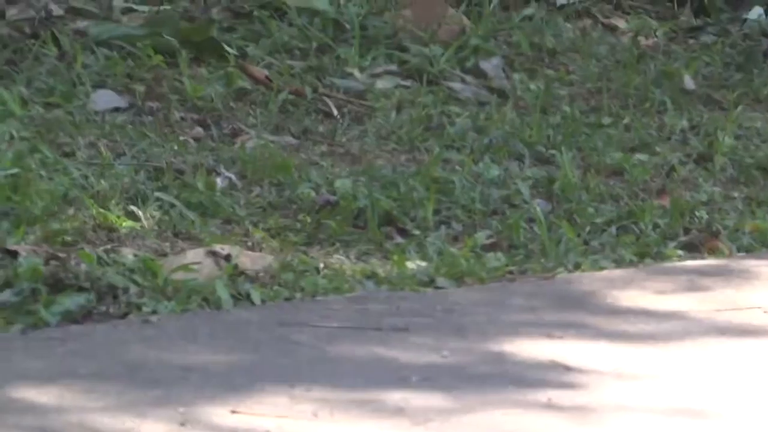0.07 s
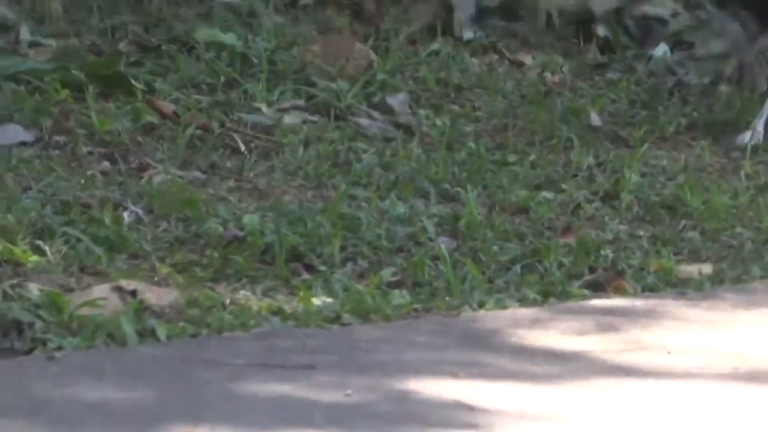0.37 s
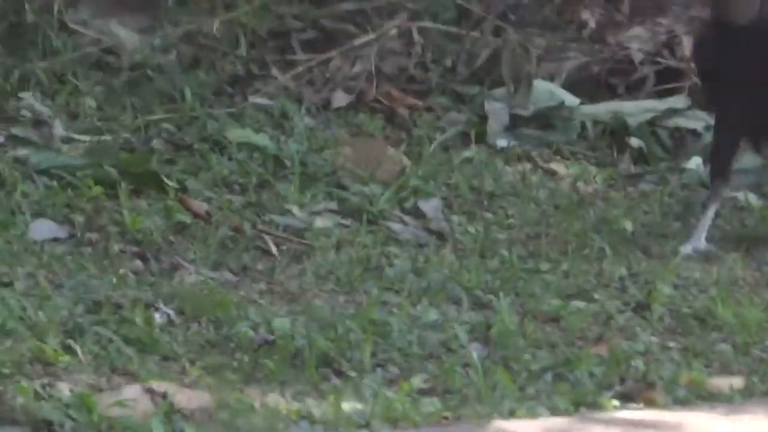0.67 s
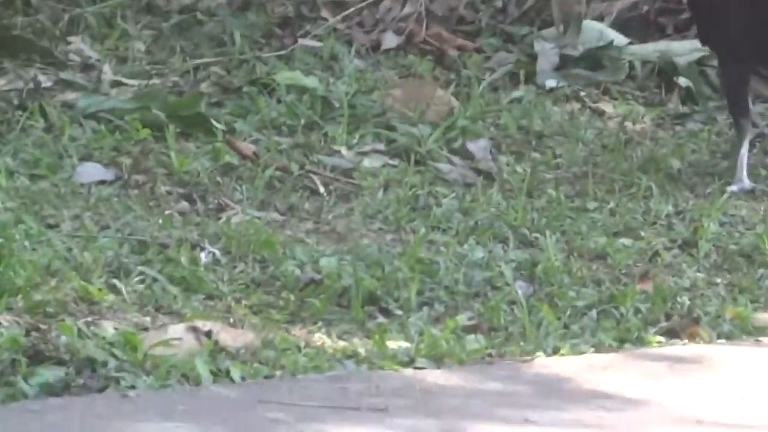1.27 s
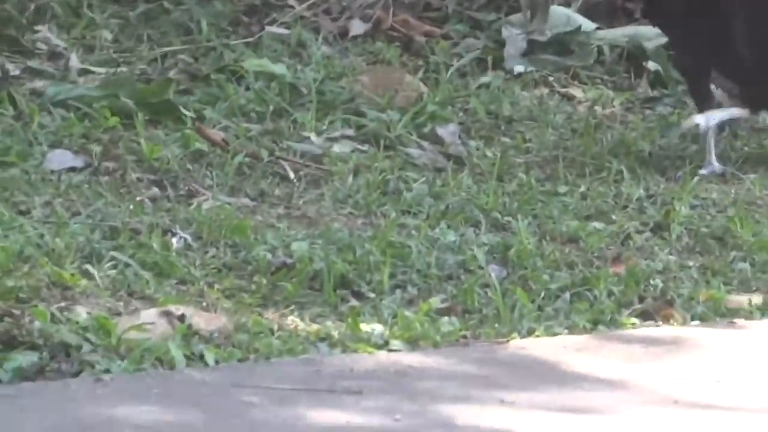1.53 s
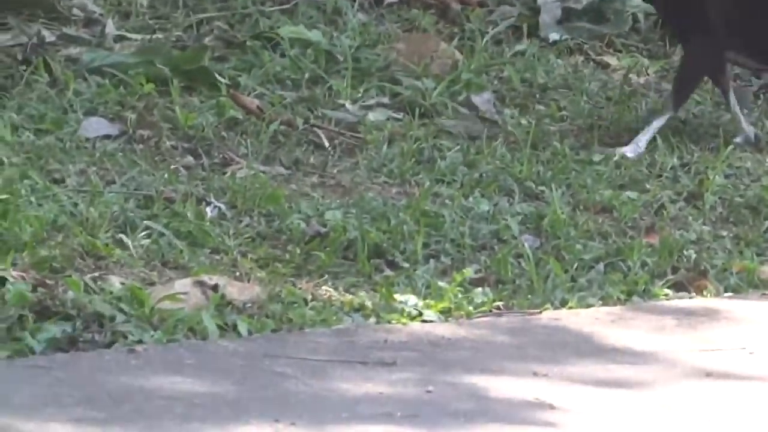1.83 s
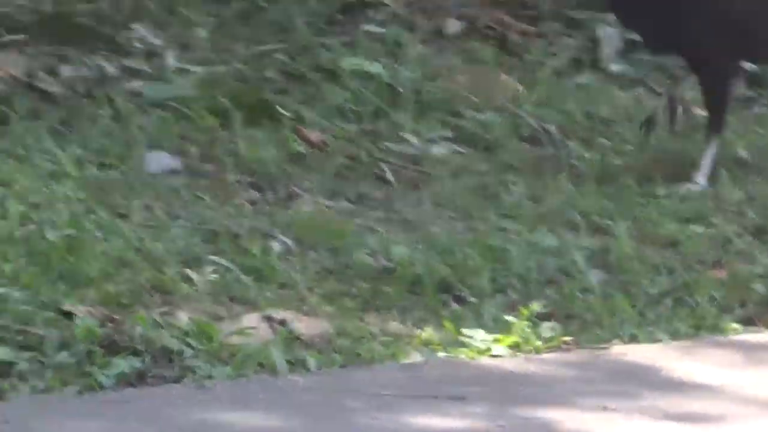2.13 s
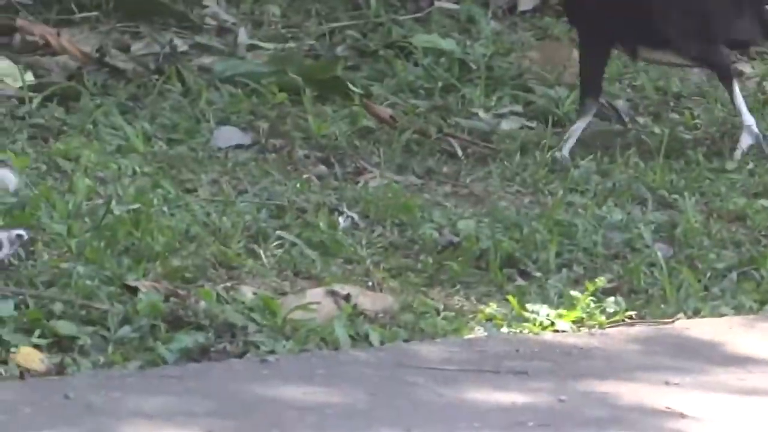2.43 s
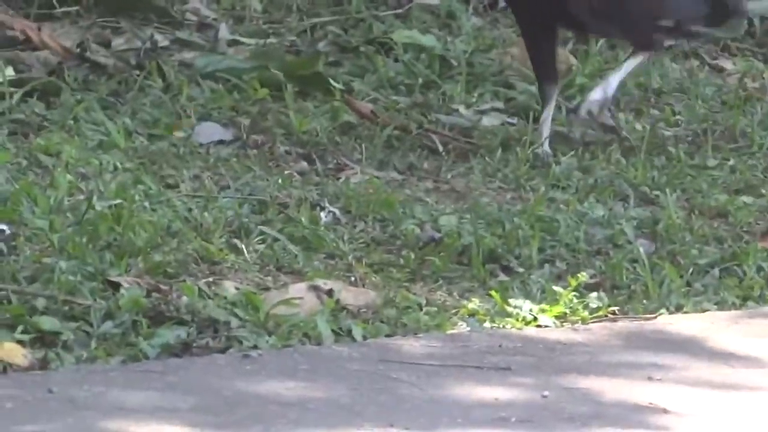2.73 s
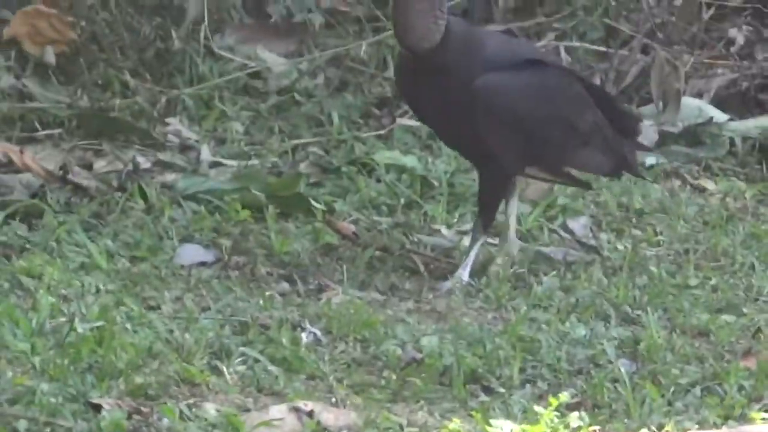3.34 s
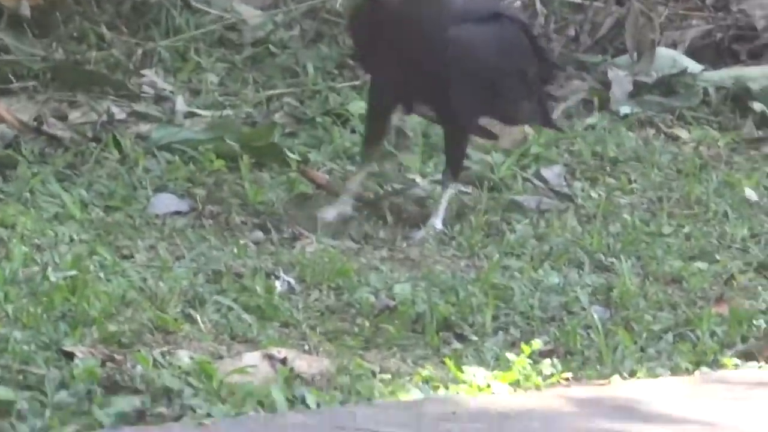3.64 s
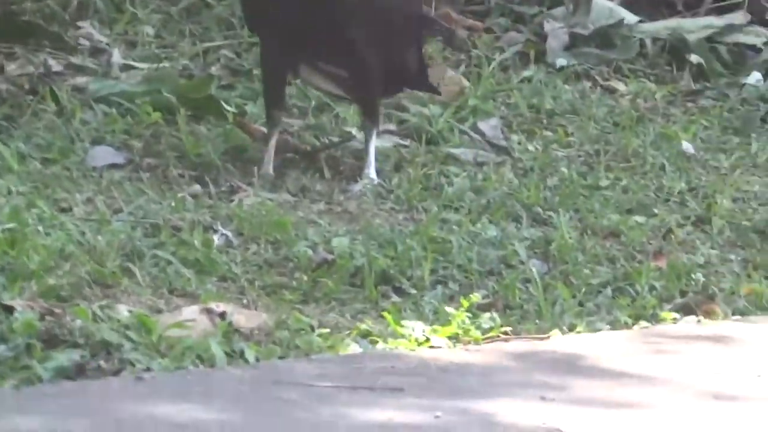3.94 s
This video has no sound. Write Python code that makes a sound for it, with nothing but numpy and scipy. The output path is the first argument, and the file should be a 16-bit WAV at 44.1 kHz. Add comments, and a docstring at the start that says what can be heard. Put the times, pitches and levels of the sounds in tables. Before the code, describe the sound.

Distant traffic rumbles steadily outdoors under hiss, while a walking bird faintly ticks through grass.

```python
"""Beside a grassy path

A low rumble and a dull roar, as of distant traffic, run on with a faint hum and a camera's own hiss.
Rumble, roar and hiss are shaped noise; the hum is a few soft tones. While a bird walks by, dry grass
ticks, a leaf cracks and faint blips sound. Two close microphones hear the bass alike; the roar leans right."""
import sys
import numpy as np
from scipy import signal
from scipy.fft import rfft, irfft
from scipy.io import wavfile
from scipy.ndimage import uniform_filter1d

SR = 44100
rng = np.random.default_rng(int(sys.argv[2]) if len(sys.argv) > 2 else 0)


def log_audio(samples):
    """Write samples as a 16-bit WAV file to the path given in sys.argv[1]."""
    # one column per channel
    frames = np.atleast_2d(samples).T
    # limit to full scale, then quantise
    limited = np.clip(frames, -1, 1)
    pcm = np.round(limited * 32767).astype(np.int16)
    wavfile.write(sys.argv[1], SR, pcm)


N = 176400
FRAME, HOP = 4096, 1024  # noise is shaped in overlapping slices: their length and spacing in samples
HZ = np.fft.rfftfreq(FRAME, 1 / SR)
FRAME_S = np.arange(N // HOP + 5) * HOP / SR


def rumble(level_db=-44.7):
    """A low rumble, as of distant traffic; it rises and falls most near 200 Hz, where it is strongest."""
    # Each row: frequency in Hz, strength of the noise there in dB.
    spectrum = [(10, -38), (25, -28), (40, -25), (52, -14.5), (70, -12.7), (120, -8.1), (148, -9.5),
                (195, 0), (225, -.7), (288, -3.5), (340, -10.2), (400, -10.7), (470, -18), (620, -32),
                (1500, -80)]
    # Each row: time in seconds, boost or cut of the strongest part in dB.
    swell = [(0, -.6), (.12, -1.8), (.25, .3), (.45, .3), (.8, -1.8), (.92, .8), (1.22, -1), (1.31, 3.6),
             (1.45, 1.3), (1.7, -1.6), (1.9, -1), (1.97, 2.8), (2.05, -1), (2.8, .4), (3.2, .3),
             (3.6, -1.2), (3.87, 1), (4, -1)]
    swell_db = bell_curve(centre_hz=215, width_hz=85) * over_time(swell)
    return noise(level_db + at_hz(spectrum, HZ) + swell_db)


def roar(level_db=-44.8):
    """A dull roar that swells a little; a ringing in it comes and goes, and its top slowly dulls."""
    # Each row: frequency in Hz, strength of the noise there in dB.
    spectrum = [(150, -45), (490, -16.3), (610, -15.5), (725, -9.8), (820, -12.3), (900, -17), (1000, -17),
                (1110, -14.2), (1300, -18.7), (1450, -23.2), (1570, -18.6), (1800, -21.4), (2030, -19.8),
                (2350, -24.4), (2520, -22.8), (2640, -25.8), (2730, -22.8), (2830, -25.5), (2940, -22),
                (3150, -26.3), (3650, -27.4), (4200, -31.8), (4450, -39.5), (4950, -45.5), (5500, -57),
                (7000, -85)]
    # Each row of these three: time in seconds, boost or cut in dB.
    swell = [(0, -.6), (.9, -.7), (1.5, .3), (2.2, -.1), (2.75, .3), (3.3, -.3), (3.68, 1), (4, .3)]  # the whole roar
    edge_level = [(0, 1), (.3, 2.2), (1.1, 1.3), (1.8, .5), (2.5, -1), (3, -3.5), (3.4, -1.2), (4, -1.2)]  # its highest part
    ring_level = [(0, -1.2), (1, -.5), (1.6, 1.5), (2.5, 1), (3.3, -.1), (4, 0)]  # one narrow, ringing band
    edge_db = bell_curve(centre_hz=4600, width_hz=950) * over_time(edge_level)
    ring_db = bell_curve(centre_hz=1110, width_hz=120) * over_time(ring_level)
    return noise(level_db + at_hz(spectrum, HZ) + over_time(swell) + edge_db + ring_db)


def grass_tick(db, rise_s=.00025, tail_db=-21, tail_s=.018):
    """A soft, bright snap of dry grass with a faint fizzing tail."""
    # The tones the snap rings with. Each row: pitch in Hz, level in dB against the strongest.
    tones = [(8400, 0), (9900, -4), (14000, -13)]
    t = np.arange(0, .06, 1 / SR)
    treble = signal.butter(2, [7000, 10500], "bandpass", fs=SR, output="sos")
    fizz = unit(signal.sosfilt(treble, rng.standard_normal(len(t))))
    tail = fizz * amp(tail_db) * np.exp(-t / tail_s)
    snap = sum(pan(hz) * amp(tone_db) * np.sin(2 * np.pi * hz * t) for hz, tone_db in tones)
    return amp(db) * (snap * rise_and_fade(t, rise_s) + tail)


def leaf_crack(db=-33, centre_hz=3900, rise_s=.0025):
    """A dry leaf cracks: a short, broad burst of noise."""
    t = np.arange(FRAME) / SR
    band = bell_curve(centre_hz, width_hz=650)
    burst = unit(irfft(rfft(rng.standard_normal(FRAME)) * band))
    return pan(centre_hz) * amp(db) * burst * rise_and_fade(t, rise_s)


def blip(db, hz, length_s):
    """A brief tone that swells and fades, its pitch wavering by just under one percent."""
    t = np.arange(0, length_s, 1 / SR)
    pitch_hz = hz * (1 + .008 * drift(N, size=200)[:len(t)])
    cycles = np.cumsum(pitch_hz) / SR
    swell = np.sin(np.pi * t / length_s) ** 2
    return pan(hz) * amp(db) * swell * np.sin(2 * np.pi * cycles)


def hum(wander_hz=.6):
    """Faint, steady tones that waver slightly in pitch."""
    # Each row: pitch in Hz, level in dB.
    tones = [(17.5, -58), (50, -46.5), (204.5, -44), (400, -54), (497, -52), (812, -53)]
    out = np.zeros((2, N))
    for hz, db in tones:
        pitch_hz = hz + wander_hz * drift(N, size=12000)
        cycles = rng.random() + np.cumsum(pitch_hz) / SR
        out += pan(hz) * amp(db) * np.sqrt(2) * np.sin(2 * np.pi * cycles)
    return out


def hiss(level_db=-44.6):
    """The camera's own high, nearly even hiss."""
    # Each row: frequency in Hz, strength of the noise there in dB.
    spectrum = [(3500, -75), (5600, -55), (6500, -49.8), (7300, -43), (9100, -41.5), (10300, -48.2),
                (11500, -53.5), (13200, -61.3), (15000, -56), (15700, -58)]
    # Each row: time in seconds, boost or cut in dB.
    swell = [(0, -.2), (1.1, -.2), (1.6, .2), (1.72, 1.3), (1.95, .2), (4, .1)]
    return noise(level_db + at_hz(spectrum, HZ) + over_time(swell))


def noise(shape_db):
    """Noise shaped over time and frequency, as two close microphones hear it."""
    # Each row: frequency in Hz, how alike the two sides are from 0 to 1.
    likeness = [(200, .999), (400, .982), (500, .925), (750, .983), (1400, .95), (2200, .967), (3800, .91),
                (5100, .4), (6000, .43), (7300, .88), (9800, .92), (10600, .998)]
    # Each row: frequency in Hz, how far the left wave runs ahead in radians (6.28 is one cycle).
    left_lead = [(100, 0), (350, -.15), (550, .15), (1300, -.12), (2700, -.15), (4400, -1.3), (5300, -3.1),
                 (6100, -4.7), (7200, -5.4), (9400, -5.7), (10400, -6.28)]
    white = rng.standard_normal((2, (len(FRAME_S) - 1) * HOP)) * np.sqrt(SR / 2)
    slices = signal.stft(white, nperseg=FRAME, noverlap=FRAME - HOP)[2]
    right, unrelated = slices.transpose(0, 2, 1)
    same = np.clip(at_hz(likeness, HZ), 0, 1)
    left = (same * right + np.sqrt(1 - same ** 2) * unrelated) * np.exp(1j * at_hz(left_lead, HZ))
    shaped = np.array([left, right]) * pan(HZ)[:, None] * amp(shape_db)
    return signal.istft(shaped.transpose(0, 2, 1), nperseg=FRAME, noverlap=FRAME - HOP)[1][:, :N]


def pan(hz):
    """Shares each frequency between left and right, keeping the total power the same."""
    # Each row: frequency in Hz, left level minus right level in dB.
    balance = [(120, -.2), (250, -1.3), (480, -4.2), (750, -4.6), (1100, -3.2), (1450, -6), (2200, -5.3),
               (2900, -7.6), (3300, -11.7), (4200, -11.8), (5000, -4.8), (5600, -.1), (6700, 4.6),
               (7600, 1.8), (10500, 0)]
    ratio = amp(at_hz(balance, np.atleast_1d(hz)))
    return np.array([ratio, np.ones_like(ratio)]) * np.sqrt(2 / (1 + ratio ** 2))


def amp(db):
    """Turns decibels into a number to multiply by."""
    return 10 ** (np.asarray(db) / 20)


def unit(x):
    """Scales a signal to an average power of 1."""
    return x / np.sqrt(np.mean(x ** 2) + 1e-20)


def at_hz(points, hz):
    """Reads between a table's rows, with frequencies spaced as the ear hears pitch."""
    row_hz, value = np.transpose(points)
    return np.interp(np.log(hz + 1), np.log(row_hz + 1), value)


def over_time(points):
    """Reads a level curve at every time slice."""
    return np.interp(FRAME_S, *np.transpose(points))[:, None]


def bell_curve(centre_hz, width_hz):
    """A smooth hump that picks out the frequencies around a centre."""
    return np.exp(-.5 * ((HZ - centre_hz) / width_hz) ** 2)


def rise_and_fade(t, rise_s):
    """Climbs to 1 in rise_s seconds, then dies away."""
    return t / rise_s * np.exp(1 - t / rise_s)


def drift(count, size):
    """Smooth random wandering; a larger size, in samples, makes it slower."""
    return unit(uniform_filter1d(uniform_filter1d(rng.standard_normal(count), size), size))


def add(mix, start_s, sound):
    """Mixes a sound in at its start time."""
    part = mix[:, round(start_s * SR):][:, :sound.shape[-1]]
    part += sound[..., :part.shape[1]]


def scene():
    """The steady layers with the small sounds on top."""
    # Ticks in the grass. Each row: start in seconds, level in dB.
    ticks = [(1.650, -39), (1.690, -31)]
    # Short high pips, then longer, lower distant tones.
    # Each row: start in seconds, level in dB, pitch in Hz, length in seconds.
    blips = [(.227, -32.5, 3650, .016), (.977, -33, 3650, .013), (1.754, -32.5, 3550, .011),
             (2.705, -28, 705, .05), (2.872, -27.5, 711, .05), (3.642, -24, 732, .055)]
    mix = rumble() + roar() + hiss() + hum()
    for start_s, db in ticks:
        add(mix, start_s, grass_tick(db))
    for start_s, db, hz, length_s in blips:
        add(mix, start_s, blip(db, hz, length_s))
    add(mix, start_s=1.108, sound=leaf_crack())
    return mix


def record(dry):
    """A steep filter cuts away the very highest treble."""
    cutoff_hz = 15800
    low_pass = signal.firwin(1023, cutoff_hz, window=("kaiser", 9), fs=SR)
    return signal.oaconvolve(dry, low_pass[None], "same")


dry = scene()
out = record(dry)
log_audio(out)
```